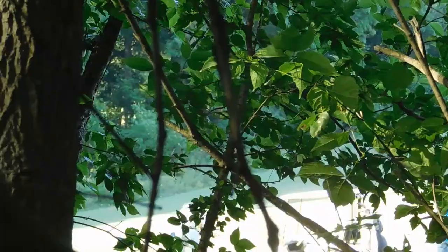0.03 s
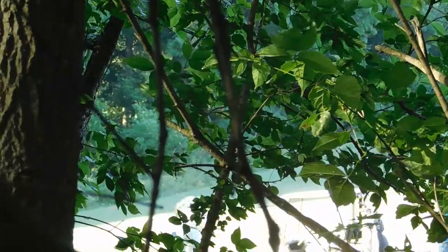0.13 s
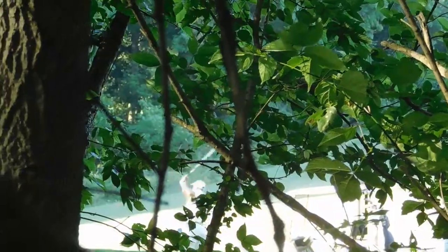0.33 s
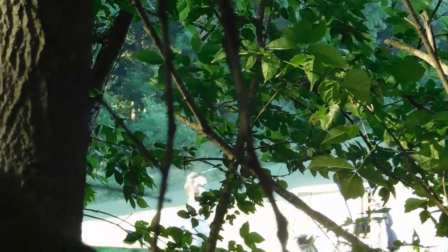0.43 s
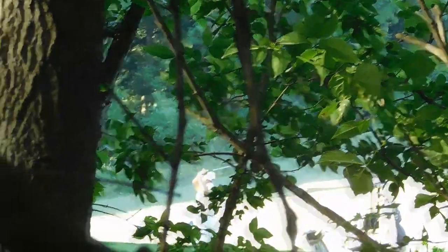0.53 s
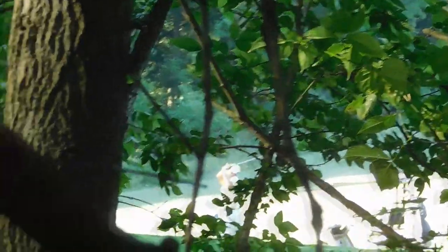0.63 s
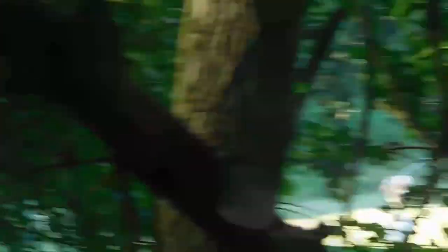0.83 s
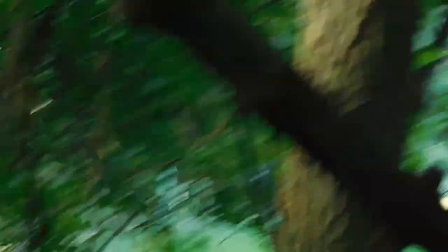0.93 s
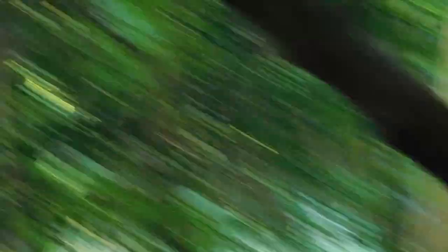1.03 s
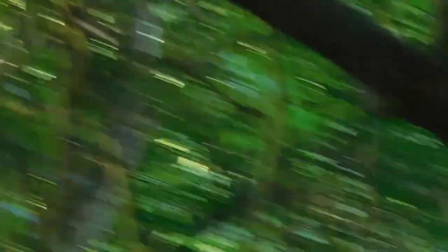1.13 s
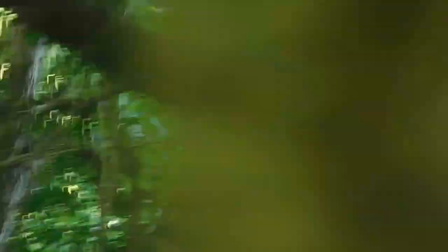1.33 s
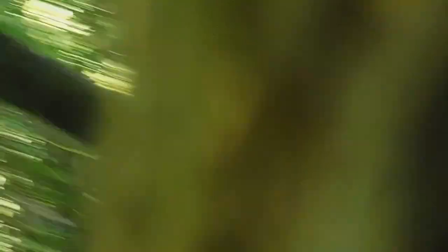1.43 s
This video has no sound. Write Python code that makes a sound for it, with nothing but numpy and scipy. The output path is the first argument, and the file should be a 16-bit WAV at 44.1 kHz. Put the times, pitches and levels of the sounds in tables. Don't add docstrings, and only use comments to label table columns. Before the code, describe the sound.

A compressed air horn gives one piercing half-second blast very close to the microphone, overloading it; echoes ring off trees and slopes, then twigs snap, leaves brush and the camera knocks over faint distant hum.

```python
import sys
import numpy as np
from scipy import signal
from scipy.fft import rfft, irfft
from scipy.io import wavfile
from scipy.ndimage import uniform_filter1d

SR = 44100
rng = np.random.default_rng(int(sys.argv[2]) if len(sys.argv) > 2 else 0)


def level_to_linear(level):
    exponent = np.asarray(level, float) / 20
    return 10 ** exponent


def to_wav(s):
    ch = np.atleast_2d(s).T
    pcm = np.round(np.clip(ch, -1, 1) * 32767)
    wavfile.write(sys.argv[1], SR, pcm.astype(np.int16))


N = 66150
TIME_S = np.arange(N) / SR


def curve(table, col=1):
    rows = np.array(table)
    return np.interp(TIME_S, rows[:, 0], rows[:, col], left=rows[0, col], right=rows[-1, col])


def gate(table):
    return (TIME_S > table[0][0]) & (TIME_S < table[-1][0])


def bump(centre_s, half_s):
    return np.exp(-0.5 * ((TIME_S - centre_s) / half_s) ** 2)


def unit(x):
    return x / np.sqrt(np.mean(x ** 2))


def noise(channels=2):
    return rng.standard_normal((channels, N))


def colour(x, points):
    rows = np.array(points)
    hz = np.maximum(np.arange(N // 2 + 1) * SR / N, 1)
    gain_db = np.interp(np.log(hz), np.log(rows[:, 0]), rows[:, 1])
    return unit(irfft(rfft(x) * level_to_linear(gain_db), N))


def walk(rate, channels=1):
    k = int(SR / rate)
    return unit(uniform_filter1d(uniform_filter1d(noise(channels), k), k))


def hum():
    # hz, density_db (dB per Hz)
    hum_bands = [(15, -29), (30, -11), (111, -7.5), (659, -3.5), (1000, -7.5), (1650, -5.5), (2220, -18.5),
                 (16000, -40)]
    shared, own = noise(1), noise()
    low = signal.butter(2, 1540, fs=SR, output="sos")
    both = signal.sosfilt(low, shared) + own - signal.sosfilt(low, own)
    flicker_db = 1.0 * walk(42)
    return level_to_linear(-49 + flicker_db) * colour(both, hum_bands)


def leaves():
    # centre_s, half_length_s, level_db
    brushes = [
        (0.766, 0.0092, -49.5),
        (0.858, 0.022, -52.5),
        (0.926, 0.014, -59.5),
        (1.467, 0.031, -60),
    ]
    brush = sum(level_to_linear(db) * bump(centre_s, half_s) for centre_s, half_s, db in brushes)
    grains = noise() * level_to_linear(3.55 * walk(400, channels=2))
    return brush * colour(grains, [(800, -20), (3000, 8.5), (7000, 1), (16000, -6)])


def squeak():
    # start_s, pitch_hz, level_db
    glide = [
        (1.0, 1445, -67),
        (1.01, 1564, -44),
        (1.022, 1710, -46),
        (1.033, 1510, -45),
        (1.04, 1410, -68.5),
    ]
    phase = 2 * np.pi * np.cumsum(curve(glide)) / SR
    return np.sqrt(2) * gate(glide) * level_to_linear(curve(glide, col=2)) * np.sin(phase)


def clicks():
    # start_s, level_db, centre_hz, t60_s
    knocks = [(0.765, -22.5, 2500, 0.0058), (0.768, -33.5, 2940, 0.016), (0.7843, -23.5, 1730, 0.0075),
              (0.7847, -31, 5600, 0.0088), (.8045, -42, 4988, 0.0046), (.714, -50, 4970, 0.0045),
              (1.143, -43.5, 400, 0.031), (1.192, -32.5, 756, .032), (1.257, -35.5, 650, 0.029),
              (1.376, -59, 9000, .004), (1.49, -24.5, 410, 0.017)]
    # pitch_hz, level_db, t60_s
    snap_modes = [(856, -41, 0.021), (1760, -4.5, 0.017), (2260, 1.5, 0.018), (3130, -9, 0.017),
                  (5650, 1, 0.0047), (7150, -11, 0.0054), (9205, -11, 0.013), (10780, -20, 0.0013),
                  (13100, -11, 0.0046)]
    out, t = np.zeros((2, N)), np.arange(2000) / SR
    bright = signal.butter(2, [3000, 10500], "bandpass", fs=SR, output="sos")
    for start_s, db, hz, t60_s in knocks:
        burst = rng.standard_normal((2, len(t)))
        ring = np.sin(2 * np.pi * hz * t) + 0.52 * np.sin(2 * np.pi * hz * 1.37 * t + burst[:, :1])
        spray = level_to_linear(-3) * min(hz / 2500, 2) ** 2 * signal.sosfilt(bright, burst)
        envelope = level_to_linear(db - 60 * t / t60_s) * (1 - np.exp(-t * hz * 2.2))
        i = int(start_s * SR)
        out[:, i:i + len(t)] += (envelope * (ring + spray))[:, :N - i]
    snap = level_to_linear(5 - 60 * t / 0.0041) * signal.sosfilt(bright, rng.standard_normal((2, len(t))))
    for hz, db, t60_s in snap_modes:
        port_phase = hz / 3000 * np.array([[1], [0]])
        snap = snap + level_to_linear(db - 60 * t / t60_s) * np.sin(2 * np.pi * hz * t + port_phase)
    i = int(1.2838 * SR)
    out[:, i:i + len(t)] += level_to_linear(-18) * snap * (1 - np.exp(-t / 0.0002)) * np.exp(-(t / 0.007) ** 4)
    return out


def woods(x):
    # delay_s, t60_s, level_db, treble_edge_hz
    tails = [
        (0.061, 0.56, -17, 13270),
        (0.081, 2.14, -28, 1710),
    ]
    # delay_s, level_db, left_over_right_db, treble_edge_hz
    slaps = [(0.112, -28.5, -18, 9100), (.143, -16, 6, 6000), (.255, -26.5, -14, 5270),
             (0.349, -27.5, -2, 3477), (0.419, -37.5, -3, 2470), (0.561, -37, -4, 1489),
             (.735, -39, -2.5, 2350), (0.961, -55.5, 5.5, 1197)]
    # hz, gain_db
    woods_colour = [(300, 6), (1000, 3.5), (1500, -19), (2000, 0), (3000, 0.5), (4000, -6.5), (8000, 7.5),
                    (16000, 1)]
    response = 0
    for delay_s, t60_s, db, hz in tails:
        tail = noise() * (TIME_S > delay_s) * level_to_linear(-60 * TIME_S / t60_s)
        tail = signal.sosfilt(signal.butter(2, min(hz, SR / 2.2), fs=SR, output="sos"), tail)
        response = response + level_to_linear(db) * tail / np.sqrt(np.sum(tail ** 2) / 2)
    for delay_s, db, pan_db, hz in slaps:
        soft_s = 1 / (2 * np.pi * hz)
        pulse = bump(delay_s, soft_s) / (soft_s * SR * np.sqrt(2 * np.pi))
        response = response + level_to_linear(db + np.array([[pan_db], [-pan_db]]) / 2) * pulse
    level = np.sqrt(np.mean(response ** 2))
    return signal.fftconvolve(x, colour(response, woods_colour) * level, axes=1)[:, :N]


def rasp(flow):
    # hz, density_db (dB per Hz)
    rasp_bands = [(12, -40.5), (20, 0.5), (399, -6.5), (433, -6), (491, -3.5), (900, -6.5), (1170, -31),
                  (1980, -120)]
    crackle = noise() * level_to_linear(3.5 * walk(520, channels=2))
    burst_db = 9 * bump(0.148, 0.012)
    return level_to_linear(-25 + burst_db) * flow * colour(crackle, rasp_bands + [(5000, -17.5), (16000, -31)])


def gas_pressure():
    # start_s, pressure (0-1)
    push_points = [
        (.126, .02),
        (.138, .5),
        (.166, .6),
        (.175, .97),
        (.475, .98),
        (.5, .5),
        (.525, 0.05),
    ]
    push = np.clip(curve(push_points), 0, 1)
    return push, push * gate(push_points)


def gas(flow):
    # hz, density_db (dB per Hz)
    hiss_bands = [(1200, -16), (1800, -15.5), (2400, -17.5), (3400, -19), (8000, -24.5), (16000, -30.5)]
    valve = level_to_linear(-27.5 + 1.3 * walk(340)) * bump(0.1, 0.0083)
    puff = colour(noise(), [(1000, -30), (2000, -4), (4020, 0), (9000, -12), (16000, -22)])
    hiss = colour(noise(), [(300, -63)] + hiss_bands)
    return valve * puff + level_to_linear(-21) * flow * hiss


def squeal(reed_phase):
    # start_s, pitch_hz, level_db, beating_db (against the reed)
    bell_mode = [(.1, 2707, -39, -19.5), (.112, 2526, -29.5, -32), (.122, 2480, -37.5, -36),
                 (.135, 2291, -18.5, -11), (.147, 2228, -27, -1.5), (.156, 2266, -27.5, 5),
                 (.165, 2342, -63.5, -19), (.45, 2440, -27.5, -9), (.52, 2450, -78, -7.5)]
    # (relative to the bell mode, before beating_db is added)
    sidebands = [(-2, -3.5), (-1, -0.5), (1, -10.5), (2, -24), (3, -8), (4, 0.5), (5, -5.5)]
    bell = 2 * np.pi * np.cumsum(curve(bell_mode) * (1 + 0.0032 * walk(212)[0])) / SR
    port_phase = reed_phase + np.array([[-0.25], [0]])
    beats = sum(level_to_linear(db) * np.sin(bell + round(order) * port_phase) for order, db in sidebands)
    level = gate(bell_mode) * level_to_linear(curve(bell_mode, col=2) + 2.0 * walk(140))
    return np.sqrt(2) * level * (np.sin(bell) + beats * level_to_linear(curve(bell_mode, col=3)))


def reed(reed_hz, reed_phase, push):
    # start_s, level_db
    swing_points = [
        (.084, -56),
        (.103, -33),
        (.109, -17),
        (.135, -8),
        (.47, -10),
        (.495, -10),
        (.52, -17),
        (.55, -23),
        (.585, -36),
    ]
    # left_db, right_db
    overtones = [(-2.5, 1.5), (-3.5, -7), (-7.5, -17), (-11, -14.5), (-23, -25), (-19, -23), (-22, -23),
                 (-20, -22), (-24, -26), (-25, -27), (-26, -28), (-27, -29), (-28, -30), (-32, -33),
                 (-33, -34)]
    port_leads = [-.9, -1.15, -2.1, -2.8, 2.4, -2.4, .4, .9, 1.5, 2.1, 2.6, -1.9, -.7, .3, 1.1]
    tone = 0
    for order, ((left_db, right_db), lead) in enumerate(zip(overtones, port_leads), start=1):
        slack_db = -16 * (1 - push) * np.log2(order)
        flutter_db = 0.75 * np.sqrt(order) * walk(210, channels=2)
        gain = level_to_linear(np.array([[left_db], [right_db]]) + slack_db + flutter_db)
        gain = gain * (order * reed_hz < SR / 2.5)
        tone = tone + gain * np.sin(order * reed_phase + (order - 1) ** 2 + np.array([[lead], [0]]))
    return np.sqrt(2) * gate(swing_points) * level_to_linear(curve(swing_points)) * tone


def horn(push, flow):
    # start_s, pitch_hz
    pitch = [
        (.085, 1914),
        (.106, 1291),
        (.122, 1104),
        (.146, 929.7),
        (.172, 986.2),
        (.25, 1009),
        (.47, 1002),
        (.5, 963),
        (.56, 944),
    ]
    reed_hz = curve(pitch) * (1 + 0.0013 * walk(270)[0])
    reed_phase = 2 * np.pi * np.cumsum(reed_hz) / SR
    return squeal(reed_phase) - reed(reed_hz, reed_phase, push) + gas(flow)


def scene():
    push, flow = gas_pressure()
    blast = horn(push, flow)
    far = blast[:1] * level_to_linear(-12 * (1 - push))
    return blast + woods(far) + rasp(flow) + clicks() + leaves() + squeak() + hum()


def low_pass(x):
    return signal.sosfilt(signal.butter(12, 16650, fs=SR, output="sos"), x)


def record(dry):
    power = uniform_filter1d(np.mean(dry ** 2, axis=0), int(0.00345 * SR))
    excess_gain = np.minimum(1, level_to_linear(-8) / np.sqrt(power + 1e-12))
    held = dry * excess_gain ** 0.6
    lopsided = held + 0.05 * held ** 2
    bent = signal.sosfilt(signal.butter(1, 12, "high", fs=SR, output="sos"), lopsided)
    return low_pass(np.tanh(bent))


dry = scene()
out = record(dry)
to_wav(out)
```